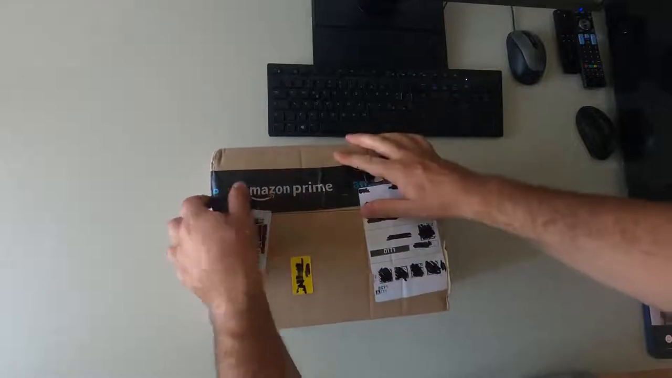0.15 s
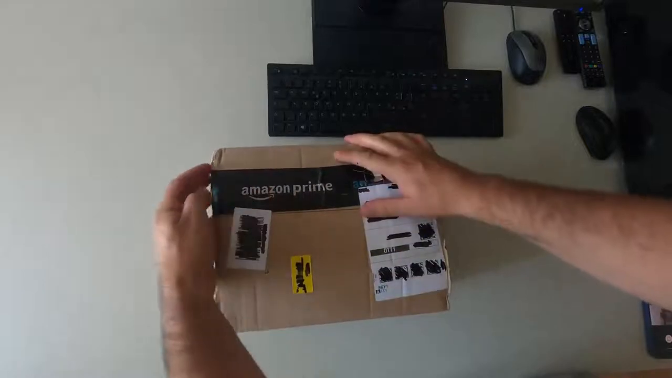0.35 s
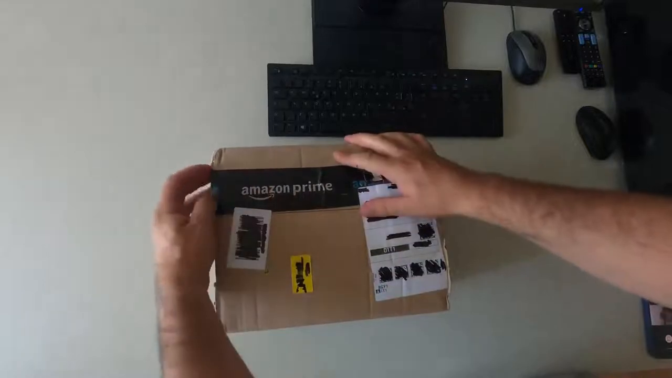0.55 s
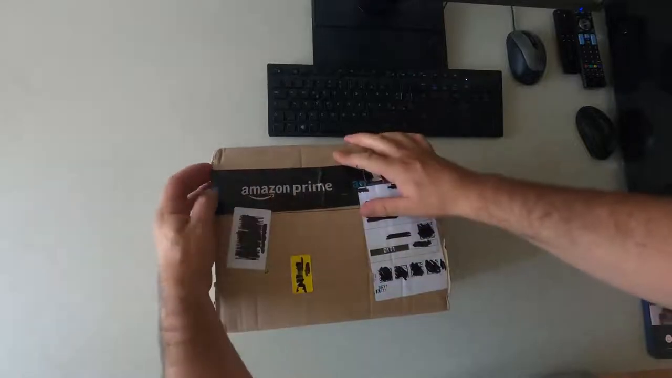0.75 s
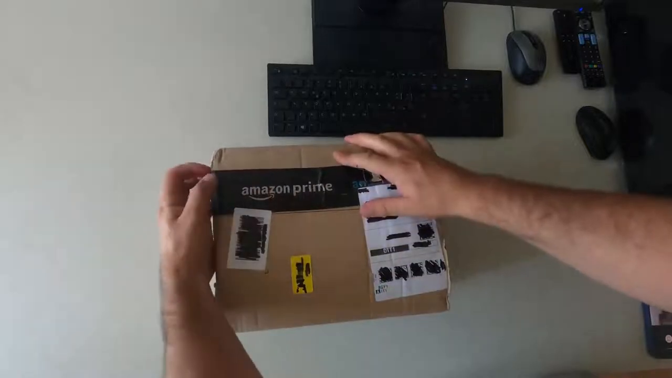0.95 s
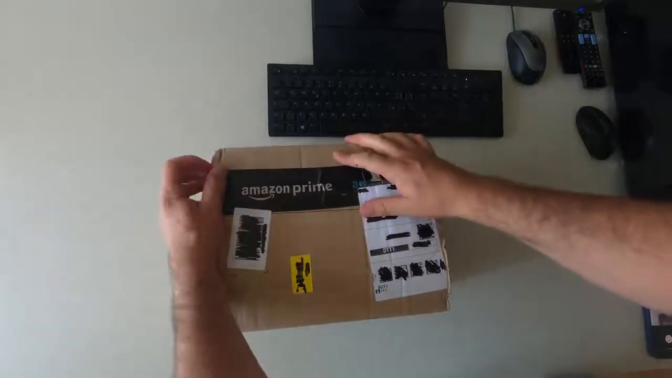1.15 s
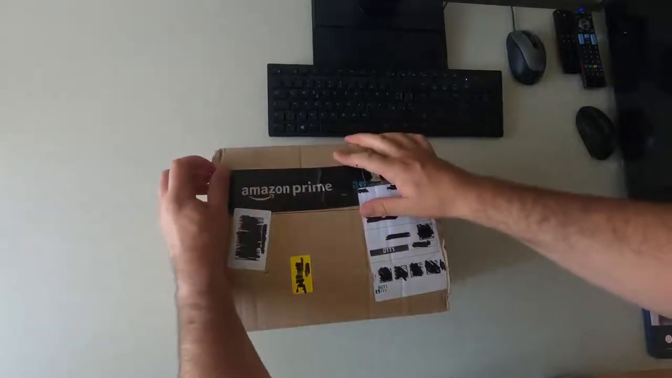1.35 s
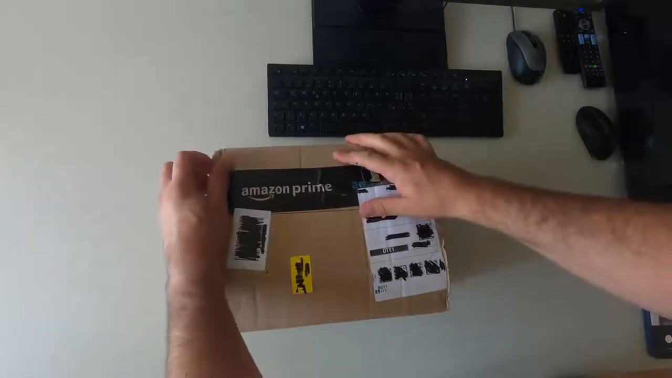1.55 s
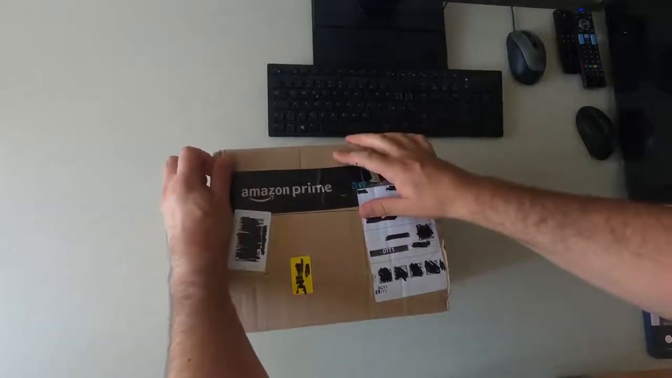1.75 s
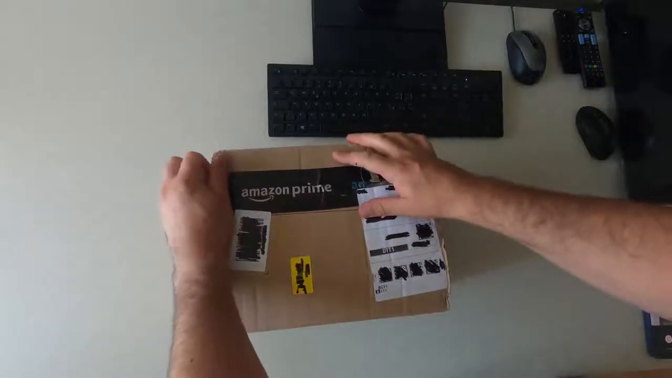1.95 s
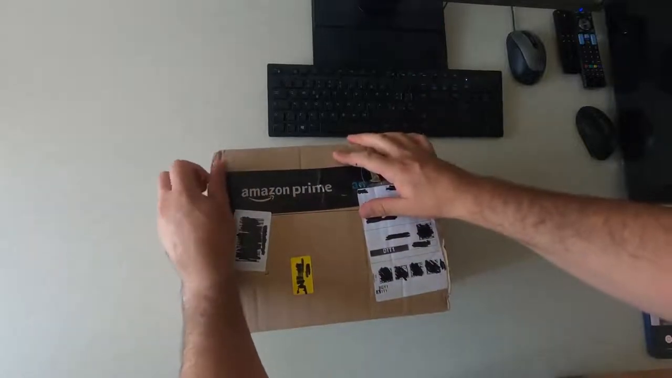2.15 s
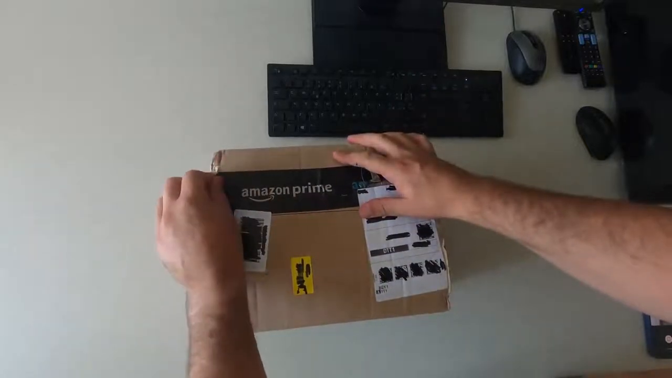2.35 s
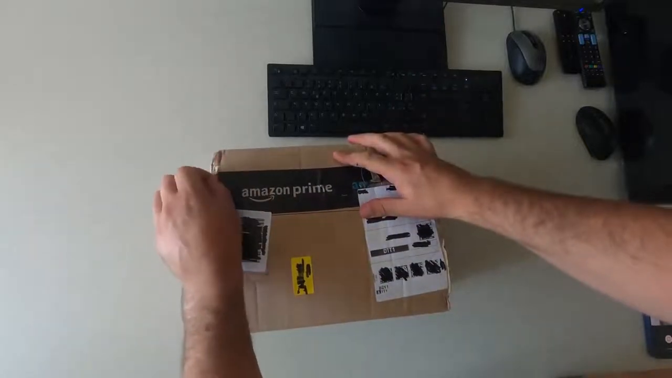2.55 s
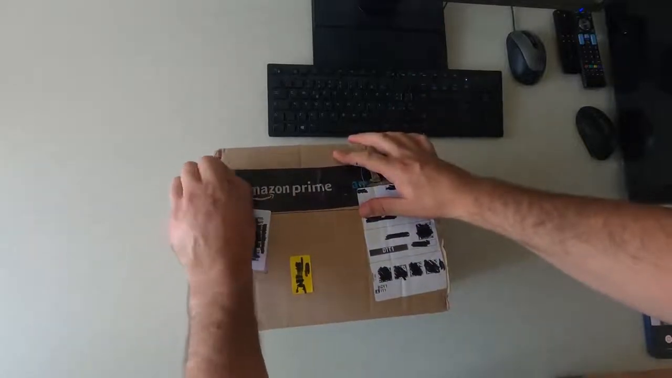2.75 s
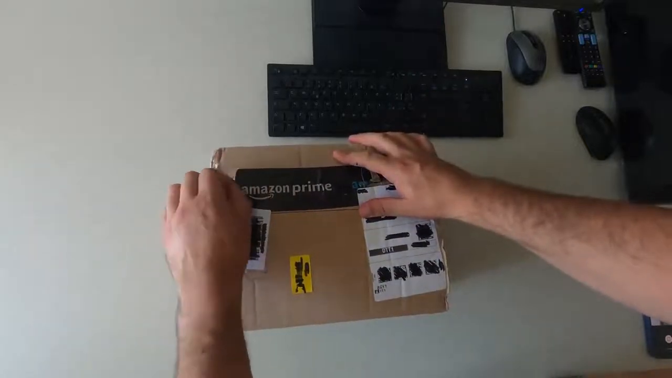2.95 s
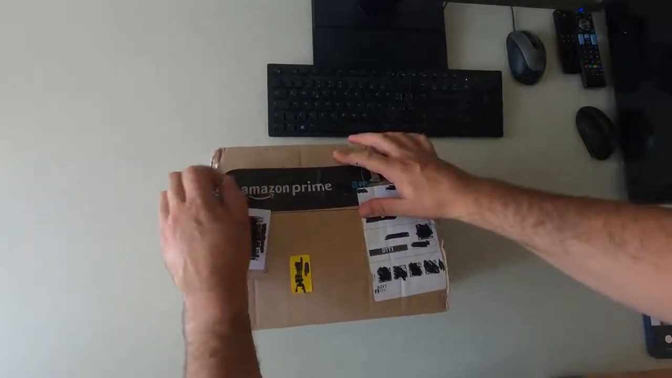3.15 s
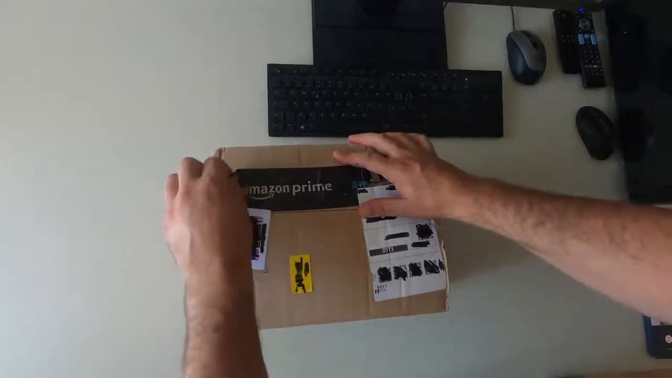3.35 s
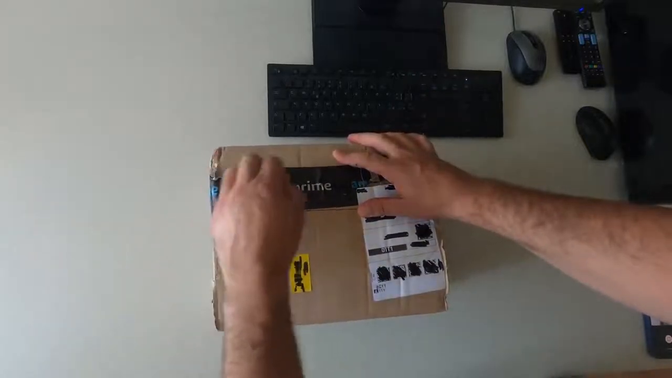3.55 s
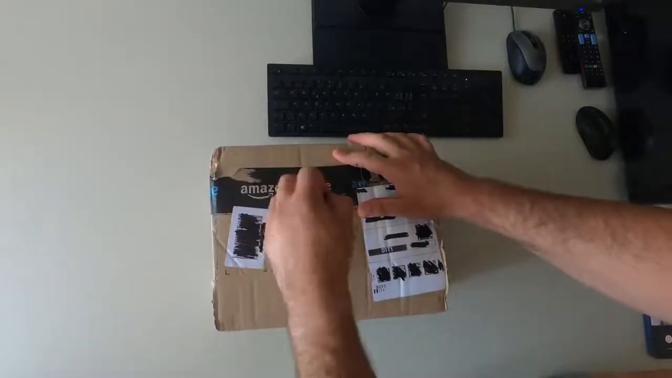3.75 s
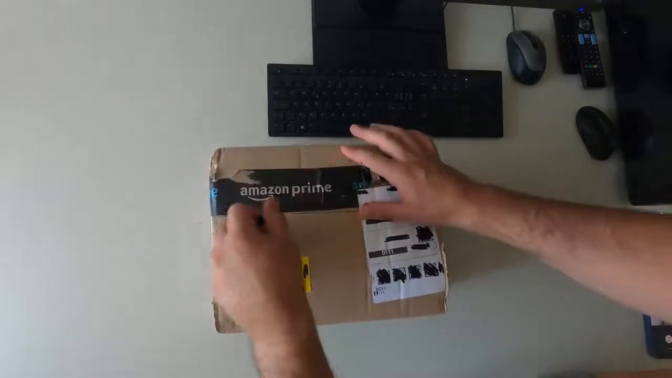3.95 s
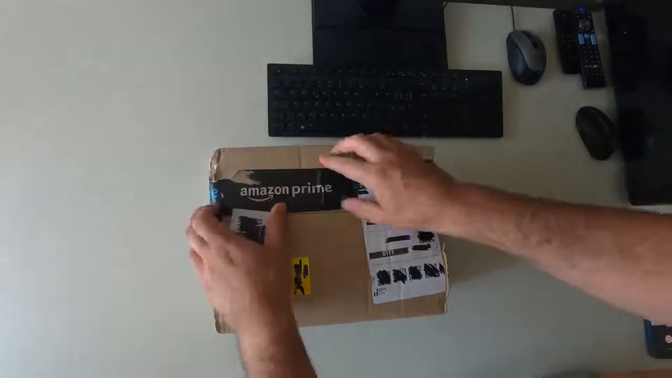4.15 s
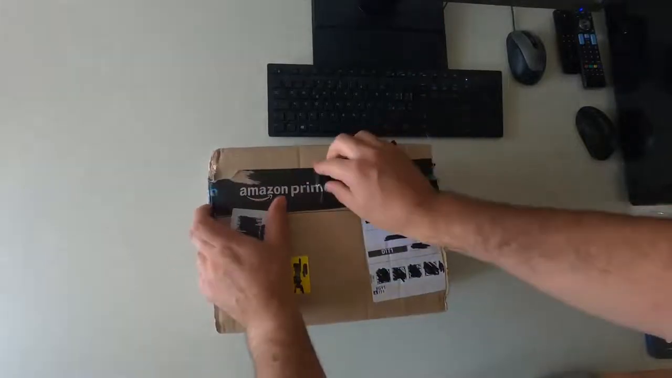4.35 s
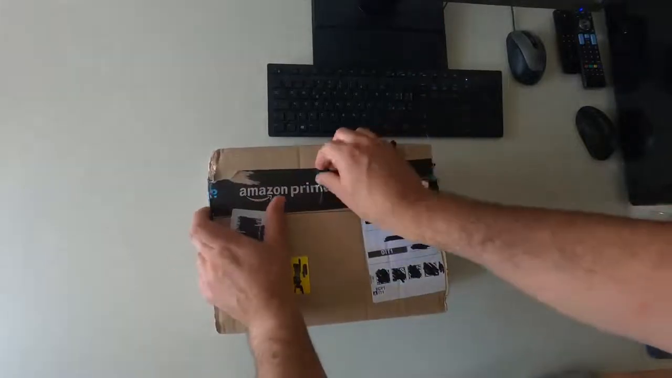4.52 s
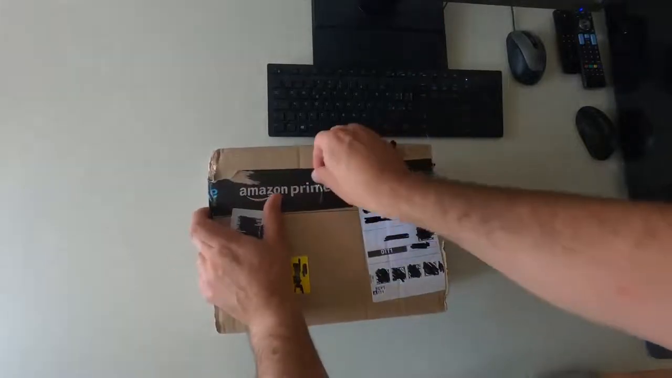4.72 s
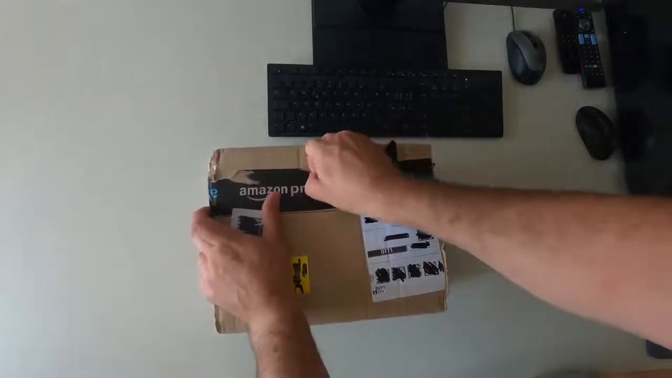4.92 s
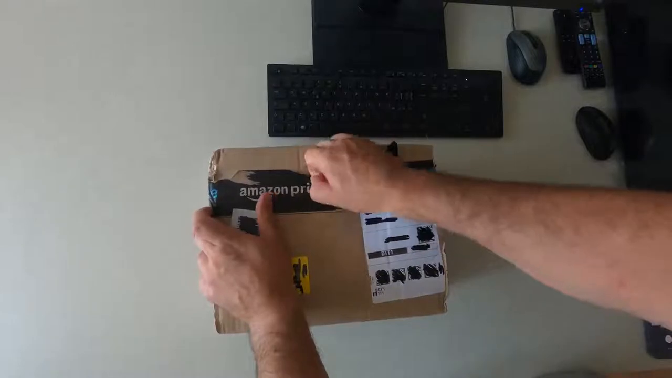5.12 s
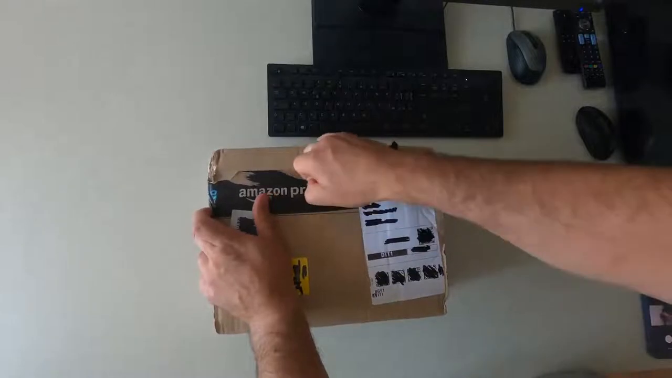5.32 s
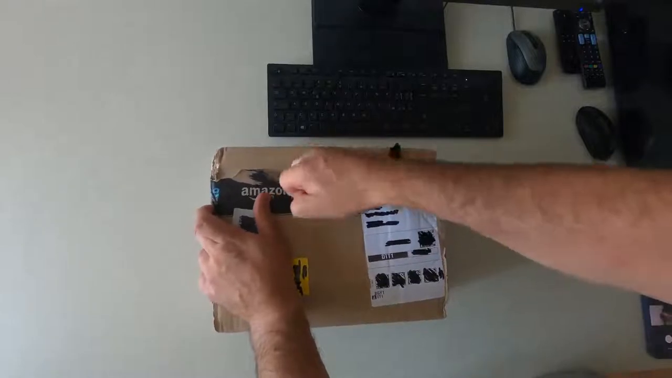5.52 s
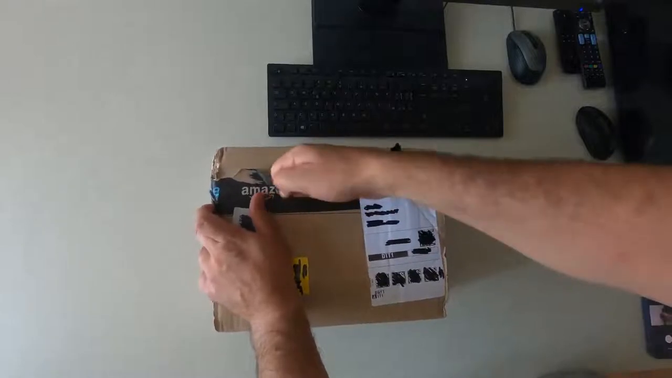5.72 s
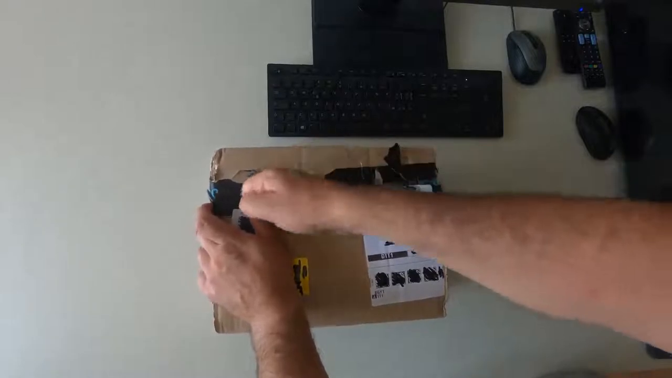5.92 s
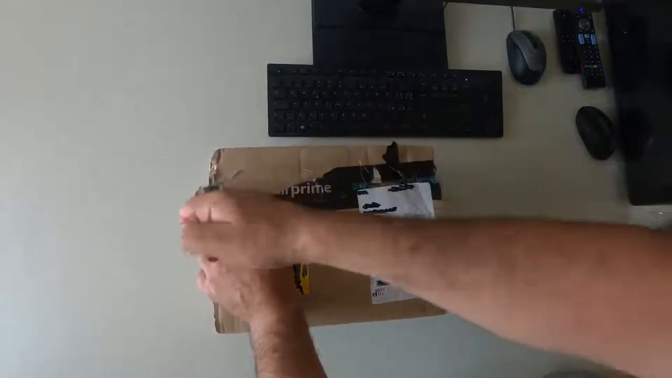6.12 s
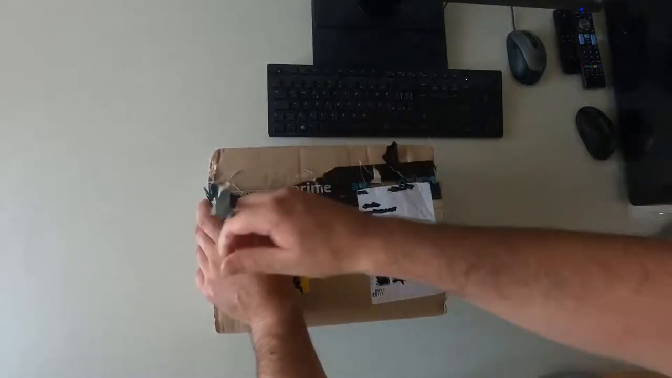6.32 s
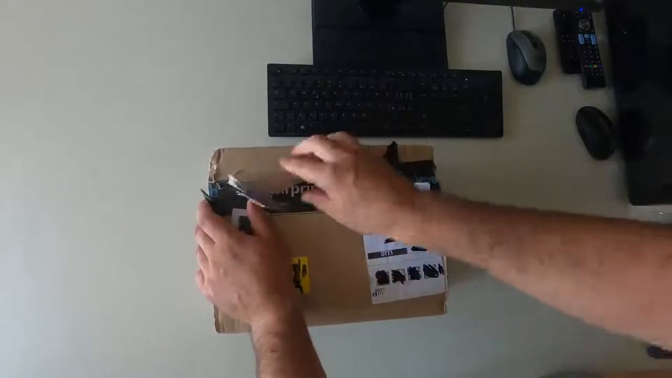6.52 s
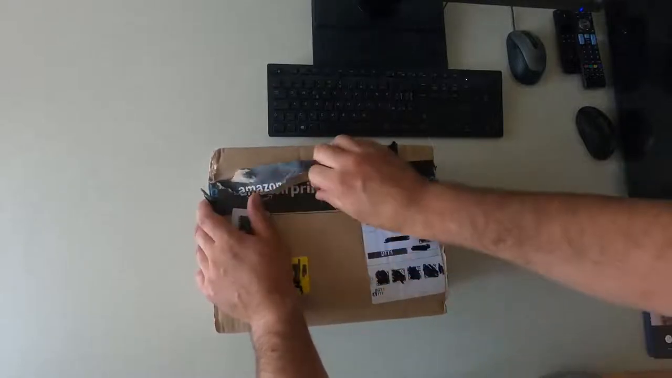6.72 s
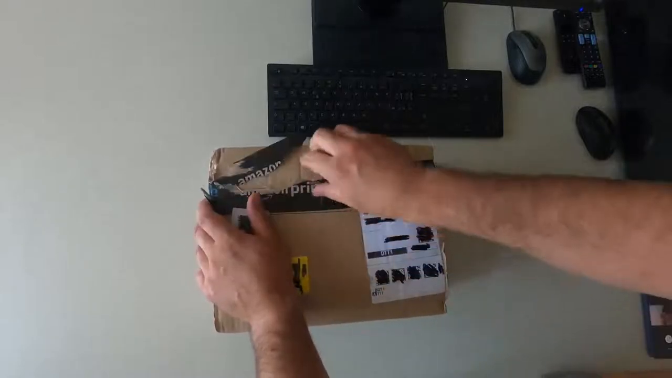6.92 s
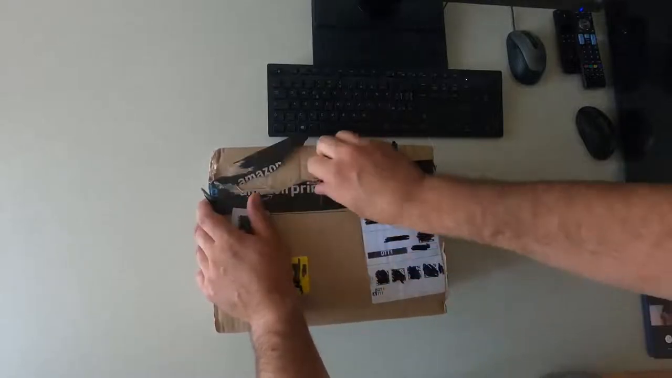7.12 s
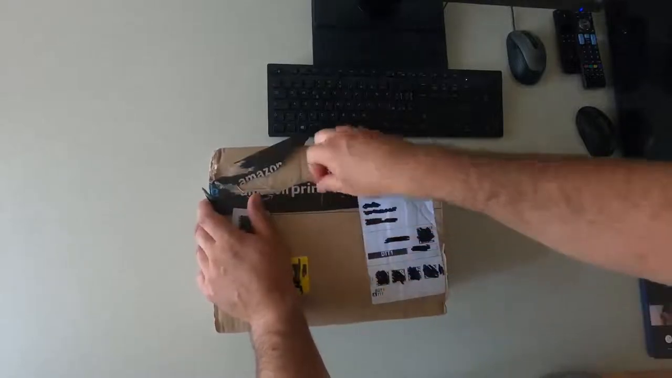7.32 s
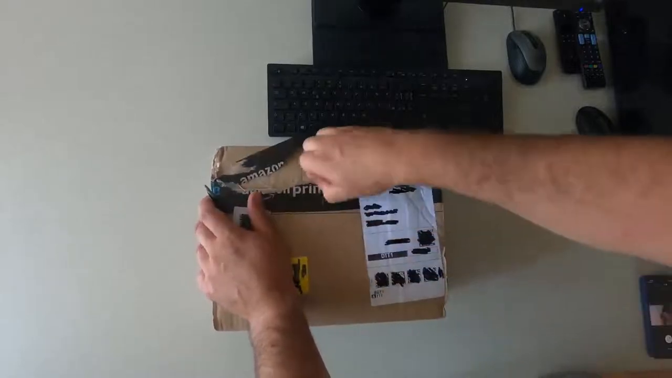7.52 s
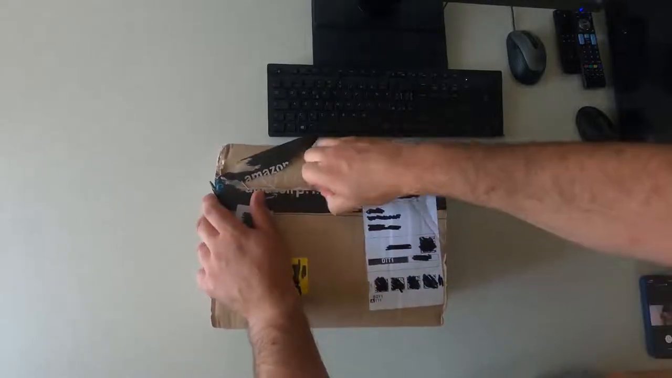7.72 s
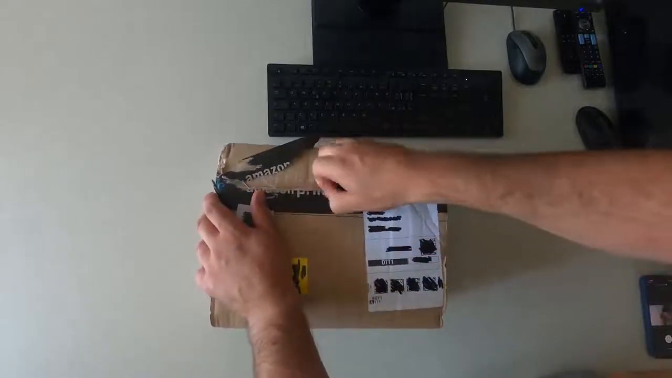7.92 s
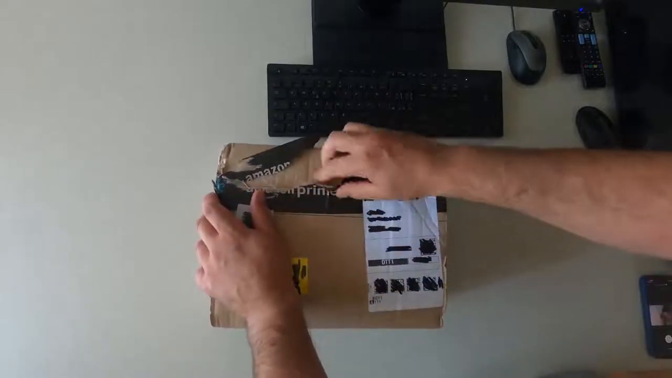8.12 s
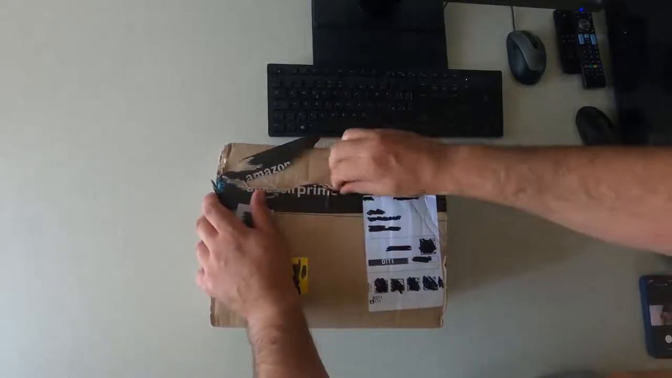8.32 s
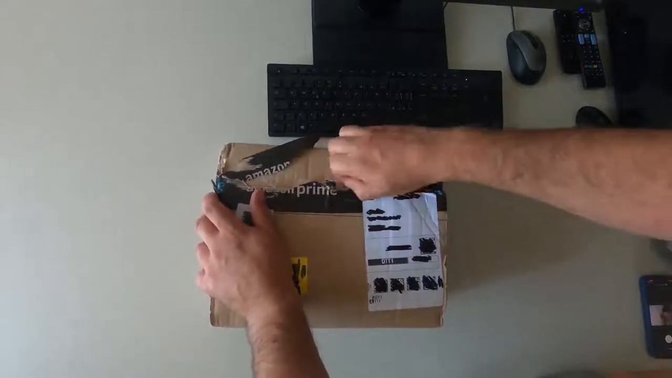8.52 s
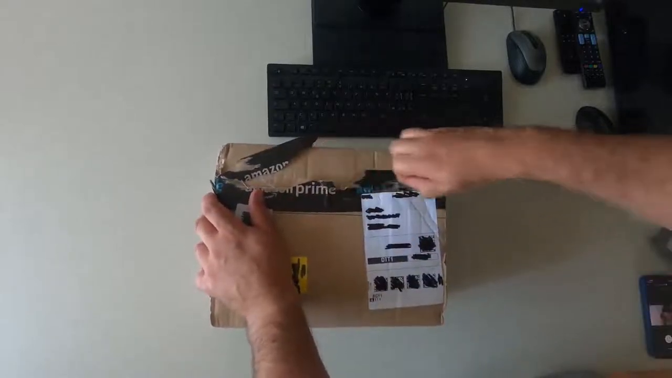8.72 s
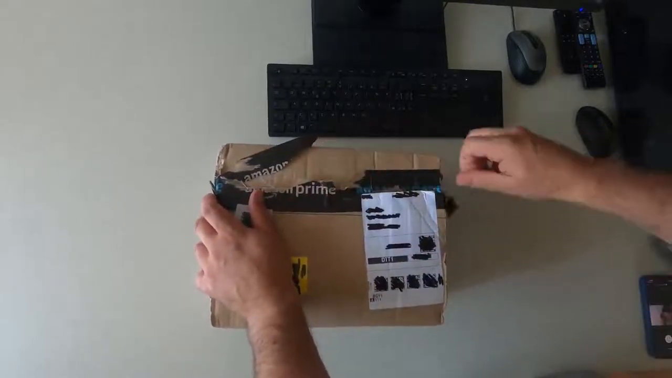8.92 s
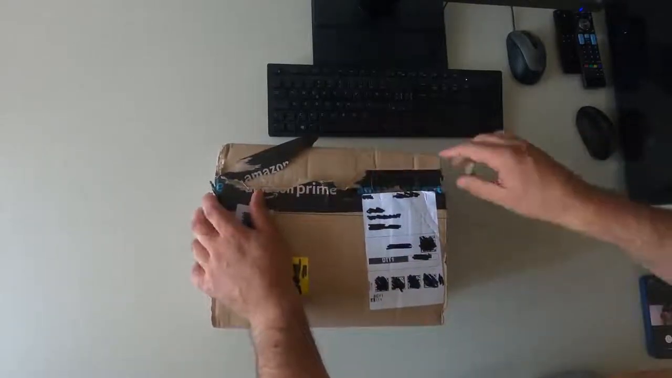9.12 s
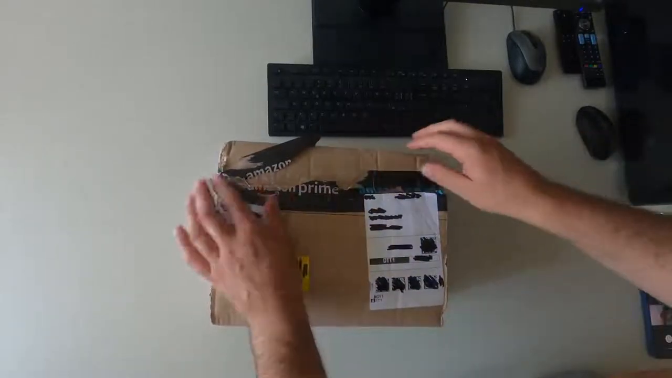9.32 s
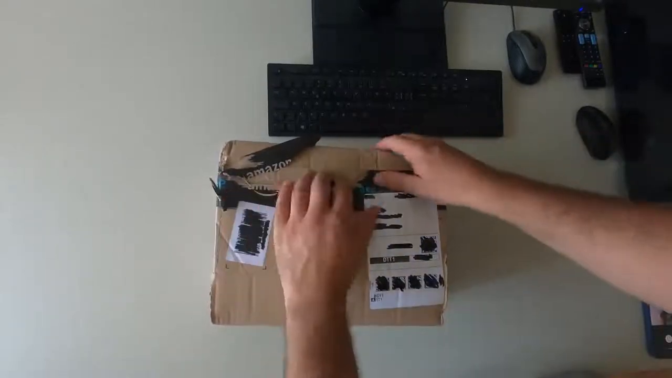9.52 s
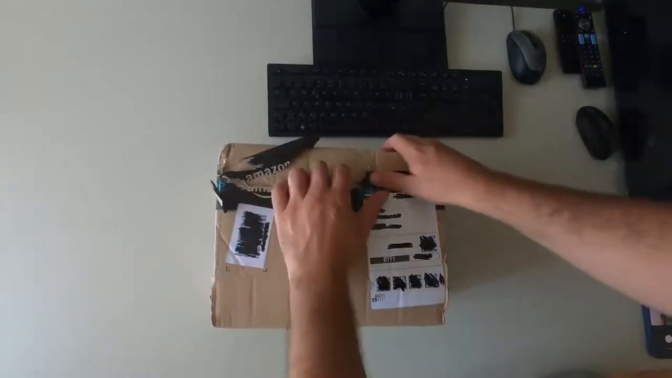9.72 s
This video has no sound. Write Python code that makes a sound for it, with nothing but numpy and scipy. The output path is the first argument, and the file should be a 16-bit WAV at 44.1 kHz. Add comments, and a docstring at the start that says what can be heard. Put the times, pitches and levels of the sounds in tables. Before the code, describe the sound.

Dry tape crackles and snaps loose from a cardboard carton in uneven tearing bursts, with hollow thumps and soft desk bumps in a small room.

```python
"""Tape ripped off a cardboard box

Hands pick at and rip paper tape off a box on a desk, in a small room, under a camera.
Glue and fibres let go as random-click crackle and single noise bursts with short tones;
both drive resonances of the hollow box and its flaps. Knocks ring box and desk; shoves bump the desk.
Two microphones are mixed: a recessed one with a port resonance on both sides, an open one on the right only.
"""
import sys
import numpy as np
from scipy import signal
from scipy.fft import rfft, irfft, next_fast_len
from scipy.io import wavfile
from scipy.ndimage import map_coordinates

SR = 44100
rng = np.random.default_rng(int(sys.argv[2]) if len(sys.argv) > 2 else 0)


def dump(signal):
    """Clip the signal to [-1, 1] and save it as 16-bit WAV at the path in sys.argv[1]."""
    limited = np.clip(np.atleast_2d(signal).T, -1, 1)
    pcm = np.round(limited * 32767).astype(np.int16)
    wavfile.write(sys.argv[1], SR, pcm)


N = 434826


def amp(db):
    """Gain of a level in dB."""
    return 10 ** (np.asarray(db) / 20)


def unit(x):
    """x at rms 1."""
    return x / np.sqrt(np.mean(x ** 2) + 1e-20)


def norm(x):
    """x at energy 1."""
    return x / np.linalg.norm(x)


def along(points, hz):
    """(Hz, value) points read on a log frequency axis."""
    f, v = np.transpose(points)
    return np.interp(np.log(hz + 1), np.log(f + 1), v)


def curves(rows):
    """One value per sample for each column after the time."""
    time_s, *columns = np.transpose(rows)
    return [np.interp(np.arange(N) / SR, time_s, c) for c in columns]


def wobble(rate_hz, step=32):
    """Smooth random curve, rate_hz knots a second."""
    at = np.arange(0, N + step, step)
    knots = rng.standard_normal(int(N * rate_hz / SR) + 4)
    return np.interp(np.arange(N), at, map_coordinates(knots, [at * rate_hz / SR]))


def filtered(x, response):
    """x times a complex response of frequency."""
    m = 2 * next_fast_len(N // 2 + SR // 4)
    return irfft(rfft(x, m) * response(np.fft.rfftfreq(m, 1 / SR)), m)[..., :N]


def colour(points):
    """Causal (minimum-phase) response through (Hz, dB) points, by folding the cepstrum."""
    def response(hz):
        cepstrum = irfft(np.log(amp(along(points, hz)) + 1e-4))
        cepstrum[1:len(hz) - 1] *= 2
        cepstrum[len(hz):] = 0
        return np.exp(rfft(cepstrum))
    return response


def modes(table):
    """Causal response of (Hz, width Hz, dB) resonances, alternating in sign."""
    def response(f):
        total = 0
        for k, (c, w, db) in enumerate(table):
            total = total + (-1) ** k * amp(db) * 1j * f * w / (c * c - f * f + 1j * f * w)
        return total
    return response


def even(response):
    """The response scaled so that white noise keeps its rms."""
    def scaled(hz):
        gain = response(hz)
        return gain / np.sqrt(np.mean(np.abs(gain) ** 2))
    return scaled


def crackle(per_second, spread_db, clump_db, hiss):
    """Fibres parting: random clicks of widely spread size on a hiss, all in clumps; rms 1."""
    size_db = spread_db * np.minimum(rng.exponential(size=N), 2.6)
    clicks = (rng.random(N) < per_second / SR) * rng.standard_normal(N) * amp(size_db)
    return unit((unit(clicks) + hiss * rng.standard_normal(N)) * amp(clump_db * wobble(110)))


def stroke(start_s, swell_s, hold_s, dies_db_per_s):
    """Sample span and gain: rises 20 dB per swell time up to start_s, holds, dies linearly in dB."""
    span = np.arange(max(round((start_s - .5) * SR), 0), min(round((start_s + 1) * SR), N))
    t = span / SR - start_s
    rise_db = 20 * np.minimum(t, 0) / max(swell_s, .002)
    return span, amp(rise_db - np.multiply.outer(dies_db_per_s, np.maximum(t - hold_s, 0)))


# fingers resting and creeping on the box, before wobble and mix gains: time_s, crackle_db, drumming_db
CREEP_LEVELS = [(0.0, -65.5, -56.5), (0.85, -72.5, -55), (0.99, -75, -59), (1.43, -61.5, -57.5),
                (1.84, -67, -54.5), (1.98, -51.5, -48.5), (2.5, -65, -61.5), (2.83, -61.5, -59),
                (3.04, -93, -60), (3.32, -75, -63), (3.43, -63, -47), (3.76, -74, -65.5), (4.06, -62, -51),
                (4.28, -63, -51.5), (4.67, -66.5, -57.5), (5.22, -66, -53.5), (5.55, -69, -50),
                (5.99, -41, -51), (6.29, -66.5, -57.5), (6.45, -89.5, -67.5), (6.76, -90, -56.5),
                (7.25, -64.5, -58.5), (7.63, -64, -63), (8.02, -75, -57), (8.29, -57.5, -51),
                (8.57, -45, -47), (8.93, -86, -52.5), (9.45, -63, -57), (9.69, -54, -47), (9.86, -45, -40)]
# tugs on the tape, before mix gains; drumming, buzz and crispness re crackle:
# start_s, swell_s, hold_s, crackle_db, drumming_db, buzz_db, crisp_db, strip_ring_hz
TAPE_TUGS = [(0.189, 0.15, 0.14, -56.5, 10, 5, -8, 3420), (0.478, 0.04, 0.0077, -46, -3, -3, -12.5, 3460),
             (0.603, 0.019, 0.0058, -57, 15, 1.5, -22.5, 2340),
             (0.722, 0.024, 0.013, -54.5, 5, 5, -7.5, 3460), (0.867, 0.0017, 0.042, -48, 7.5, 6, -24, 2250),
             (0.925, 0.036, 0.036, -51.5, 15, 1, -19, 1700), (0.992, 0.02, 0.09, -59.5, 10.5, 3, -16, 2500),
             (1.135, 0.037, 0.013, -52, 12, 9, -15, 2010),
             (1.372, 0.061, 0.0097, -50, -1.5, 3.5, -13, 2830),
             (1.543, 0.098, 0.05, -56.5, 11, -0.5, -6.5, 3330),
             (1.656, 0.048, 0.17, -62.5, 16.5, 5.5, -5.5, 3200),
             (1.8, 0.045, 0.1, -53.5, -3.5, 3.5, -9.5, 3400), (1.914, 0.031, 0.0078, -33, 0, -2, -9, 4500),
             (1.942, 0.014, 0.02, -44.5, 16.5, 8, -31, 3380),
             (2.05, 0.021, 0.054, -46.5, -17, -24, -13, 3000),
             (2.13, 0.019, 0.024, -45, 5, 4.5, -14.5, 2950),
             (2.197, 0.031, 0.099, -57, 6.5, -24, -11, 3720), (2.504, 0.1, 0.16, -58.5, 5.5, -13, -6, 3950),
             (2.637, 0.01, 0.057, -31.5, 3, -1.5, -16, 2370),
             (2.804, 0.033, 0.015, -50.5, 5, -12, -8, 2310), (2.867, 0.081, 0.083, -45, 3.5, -4, -11, 2300),
             (2.967, 0.007, 0.015, -49.5, 2, -8.5, -30, 2300),
             (3.287, 0.006, 0.021, -46, 1.5, 4, -19.5, 2970),
             (3.378, 0.0018, 0.0066, -36, -2, -2, -15, 3300),
             (3.397, 0.002, 0.094, -31.5, 2.5, -5, -19, 2700),
             (3.782, 0.0073, 0.042, -60, 7.5, -1, -6.5, 3800), (3.87, 0.035, 0.1, -58, 2, -4, -14.5, 4270),
             (3.96, 0.005, 0.066, -55.5, 10.5, 6, -13, 2700),
             (4.231, 0.073, 0.034, -50, 9.5, 1, -14.5, 2800), (4.339, 0.071, 0.013, -55, 18, 4, -15, 3360),
             (4.43, 0.089, 0.046, -56.5, 15.5, 7, -31.5, 3620),
             (4.531, 0.023, 0.063, -57.5, 10.5, 3.5, -26, 3060),
             (4.717, 0.007, 0.26, -55, -10, -0.5, -2, 4700), (4.854, 0.044, 0.08, -38.5, 7, 2, -10.5, 3480),
             (5.087, 0.073, 0.027, -54, 2, -4.5, -7.5, 3830), (5.172, 0.011, 0.09, -54, 7, 3.5, -6, 3640),
             (5.296, 0.029, 0.039, -40, -2, -3.5, -9, 4000), (5.351, 0.0077, 0.012, -38, 12, -19, -9, 3480),
             (5.381, 0.031, 0.011, -23.5, 1.5, -3.5, -15.5, 2700),
             (5.459, 0.014, 0.068, -42.5, 6, 3.5, -22.5, 3080),
             (5.555, 0.025, 0.09, -45.5, 6.5, 1.5, -11.5, 3240),
             (5.596, 0.039, 0.069, -38.5, 0, -18, -12, 2760),
             (5.693, 0.014, 0.067, -44.5, 15, -14, -24, 2800),
             (5.746, 0.015, 0.055, -47.5, 18, -8, -23, 2200),
             (5.812, 0.014, 0.047, -51, 13, -5.5, -19.5, 2460),
             (5.921, 0.0017, 0.051, -34.5, 13.5, 2.5, -12, 2580),
             (5.974, 0.077, 0.09, -41, 18.5, 0.5, -17, 2640),
             (5.978, 0.0091, 0.0059, -28, -6, -7, -14.5, 3000),
             (6.047, 0.011, 0.021, -30, 5.5, -1.5, -17, 3670),
             (6.52, 0.01, 0.092, -64, 13.5, -1, -5.5, 3220), (6.628, 0.18, 0.04, -51.5, 9.5, 4, -17, 2800),
             (6.757, 0.0017, 0.092, -51, 4, 2.5, -18.5, 3300), (6.916, 0.05, 0.083, -51, 7, 9, -16.5, 2670),
             (7.081, 0.005, 0.022, -48.5, 14, 8.5, -15, 2950),
             (7.204, 0.097, 0.031, -45.5, 1.5, 1, -18.5, 4270),
             (7.358, 0.0017, 0.076, -48, 5.5, -1, -9.5, 4130),
             (7.518, 0.039, 0.024, -40, 6.5, 0.5, -14, 3830),
             (7.553, 0.022, 0.028, -38, -1, -7, -15.5, 4170),
             (7.621, 0.019, 0.024, -52, 9.5, -6, -18, 3000), (7.713, 0.021, 0.06, -53, 3, -7, -16, 3580),
             (7.782, 0.0017, 0.015, -32, 4, -14, -19, 3400), (7.932, 0.032, 0.074, -47, -6, 0, -23, 3570),
             (8.192, 0.24, 0.076, -49, 5.5, -3.5, -13, 3570),
             (8.354, 0.005, 0.041, -42.5, 5, 4, -8.5, 3750),
             (8.383, 0.004, 0.039, -37, 3.5, 2.5, -11, 3570),
             (8.455, 0.054, 0.029, -29.5, 0.5, -1, -12, 3270), (8.514, 0.039, 0.017, -30.5, 0, 3, -9, 3170),
             (8.555, 0.046, 0.022, -29.5, -5, 0, -10.5, 3260),
             (8.598, 0.017, 0.022, -32.5, -7.5, -4, -9, 3100),
             (8.701, 0.12, 0.046, -37, -1.5, -5.5, -9, 3720),
             (8.811, 0.021, 0.042, -49.5, -17, -2, -6.5, 3740),
             (8.92, 0.069, 0.033, -54.5, -3, -23, -6.5, 4130),
             (9.014, 0.033, 0.059, -54, -2, -6, -7.5, 4400), (9.12, 0.028, 0.13, -69, 18, -2, -13, 4430),
             (9.213, 0.12, 0.019, -46.5, 9, -1, -10.5, 4360),
             (9.412, 0.078, 0.065, -51.5, 7.5, -2, -6.5, 4300),
             (9.553, 0.074, 0.0092, -40.5, 5, 6, -9, 3000), (9.615, 0.024, 0.095, -45, 9.5, 2, -13, 3280),
             (9.754, 0.18, 0.03, -41.5, 3.5, 5.5, -6, 2550), (9.815, 0.018, 0.016, -34, 0, 3.5, -13, 3000)]


def pull():
    """Gains of crackle, drumming, buzz and crispness, powers summed; strip ring gliding tug to tug."""
    creep_db, box_db = curves(CREEP_LEVELS) + 3.2 * wobble(6.2)
    power = amp([creep_db, box_db, creep_db + 1, creep_db - 13.5]) ** 2
    dies_db_per_s = (705, 353, 446, 600)  # crackle, drumming, buzz, crispness
    for start_s, swell_s, hold_s, db, drum_db, buzz_db, crisp_db, _ in TAPE_TUGS:
        span, gain = stroke(start_s, swell_s, hold_s, dies_db_per_s)
        levels_db = db + np.array([[0], [drum_db], [buzz_db], [crisp_db]])
        power[:, span] += (amp(levels_db) * gain) ** 2
    mid_hold_s = [row[0] + row[2] / 2 for row in TAPE_TUGS]
    ring_hz = np.interp(np.arange(N) / SR, mid_hold_s, [row[-1] for row in TAPE_TUGS])
    return *np.sqrt(power), ring_hz


# where the loose strip can ring: centre_hz
STRIP_RINGS = (1550, 2300, 2750, 3300, 3900, 4600, 5700)


def strip(drive, ring_hz, lift, patchy_db):
    """Loose strip lifts resonances near ring_hz and an overtone; each also swells and fades by chance."""
    def close(ratio):
        return np.exp(-(np.log(ratio) / .11) ** 2)

    overtone_ratio, overtone_share = 1.367, 0.36
    out = 0.89 * drive
    for hz in STRIP_RINGS:
        match = close(ring_hz / hz) + overtone_share * close(overtone_ratio * ring_hz / hz)
        gain = (lift * match + 0.16) * amp(patchy_db * wobble(30))
        out = out + signal.lfilter(*signal.iirpeak(hz, 7, SR), drive * gain)
    return out


def walls(drive, table, patchy_db, rate_hz, struck_hz, away_db):
    """Resonances swell and fade as hands press elsewhere; those far from struck_hz lose away_db."""
    size = np.sqrt(sum(amp(db) ** 2 * np.pi * w / SR for _, w, db in table))
    out = 0
    for k, (c, w, db) in enumerate(table):
        near_db = away_db * (np.exp(-(np.log(struck_hz / c) / 0.26) ** 2) - 1)
        driven = drive * amp(near_db + patchy_db * wobble(rate_hz))
        out = out + (-1) ** k * amp(db) * signal.lfilter(*signal.iirpeak(c, c / w, SR), driven)
    return out / size


# air and walls of the box, then top flaps: centre_hz, width_hz, relative_db
BOX_MODES = [(216, 50, -8.5), (276.6, 42, -3), (347, 25.4, -0.5), (401.3, 43.7, -4.5), (429.6, 43, 0.5),
             (489, 165, -6.5), (614, 104, -11.5)]
FLAP_MODES = [(682, 26, -0.5), (777, 76, 0), (991, 111, 1.5), (1266, 350, -0.5), (1710, 315, -4)]
# spectra of parting fibres and of their crisp edge: freq_hz, relative_db (per Hz)
FIBRE_SPECTRUM = [(880, -29), (1550, 3), (1880, 0), (2150, 8), (2660, 3.5), (3550, 4.5), (4090, 6),
                  (5080, 2.5), (6420, -4), (7500, -4), (9750, -19.5), (16500, -120)]
CRISP_SPECTRUM = [(3820, -26.5), (6500, -5.5), (7470, -11.5), (8430, -5), (9980, -11.5), (12300, -11),
                  (15600, -24)]
# wall left free to drum as the hands move: time_s, pitch_hz
DRUM_PITCH = [(0.0, 285), (0.16, 340), (0.69, 296), (0.9, 468), (1.21, 370), (2.14, 403), (2.3, 310),
              (2.94, 441), (3.13, 277), (3.4, 400), (3.46, 537), (3.6, 482), (3.84, 356), (7.91, 375),
              (8.1, 445), (8.35, 310), (8.51, 430), (8.93, 269), (9.69, 377), (9.86, 354)]


def tape():
    """Crackle and snaps sound directly and through the box they are glued to."""
    parting, drumming, buzzing, crisp, ring_hz = pull()
    tear = crackle(per_second=3500, spread_db=3.2, clump_db=2.2, hiss=.65)
    scrape = crackle(per_second=700, spread_db=3.2, clump_db=2.2, hiss=.6)  # coarser jerks reach the flaps
    crack, jerk, edge, tones, snap_hz, flap_hz = snaps()
    fibres = strip(amp(-3.0) * parting * tear, ring_hz, lift=1.145, patchy_db=4.0)
    fibres = fibres + strip(crack, snap_hz, lift=.8, patchy_db=3)
    direct = filtered(fibres, even(colour(FIBRE_SPECTRUM)))
    box = walls(amp(6.0) * drumming * tear, BOX_MODES, patchy_db=3.0, rate_hz=8,
                struck_hz=curves(DRUM_PITCH)[0], away_db=7.0)
    flaps = walls(amp(2) * buzzing * scrape + amp(3.5) * jerk, FLAP_MODES, patchy_db=3.5, rate_hz=14,
                  struck_hz=flap_hz, away_db=5.5)
    crispness = filtered(amp(6.5) * crisp * tear + edge, even(colour(CRISP_SPECTRUM)))
    return tones + direct + box + flaps + crispness


# desk top resonances: centre_hz, width_hz, relative_db
DESK_MODES = [(105.3, 5.5, -12), (110.5, 40, -1), (163, 163, -1)]
# box shoved over the desk, before mix gain: start_s, hold_s, thud_db
DESK_SHOVES = [(0.042, 0.02, -67), (0.362, 0.032, -58), (0.88, 0.02, -56), (1.143, 0.038, -54),
               (1.92, 0.034, -45.5), (2.661, 0.035, -42), (2.982, 0.022, -40), (3.288, 0.029, -41.5),
               (3.398, 0.02, -41), (4.08, 0.039, -55), (4.31, 0.14, -54.5), (4.59, 0.028, -58),
               (4.87, 0.073, -47.5), (5.372, 0.025, -32.5), (5.648, 0.017, -32.5), (5.978, 0.032, -39.5),
               (6.5, 0.031, -65.5), (6.776, 0.024, -49), (7.206, 0.021, -55), (7.398, 0.035, -51),
               (7.518, 0.02, -42), (7.782, 0.014, -39.5), (8.52, 0.063, -40.5), (8.708, 0.025, -41.5),
               (9.21, 0.057, -60), (9.444, 0.033, -55), (9.84, 0.025, -45)]


def desk():
    """Box bumps and slides on the desk top, whose mass swallows the treble; one boom as the strip frees."""
    def top(hz):
        return modes(DESK_MODES)(hz) / (1 + 1j * hz / 300) ** 2

    bumps = crackle(per_second=160, spread_db=3.0, clump_db=1.5, hiss=0.88)
    weight = amp(curves(CREEP_LEVELS)[1] - 6.5)  # under creeping fingers
    for start_s, hold_s, db in DESK_SHOVES:
        span, gain = stroke(start_s, swell_s=0.016, hold_s=hold_s, dies_db_per_s=302.5)
        weight[span] += amp(db) * gain
    boom_s, boom_half_s, boom_db, boom_hz = 8.658, 0.036, -29.5, 93  # half width to 1/e
    t = np.arange(N) / SR - boom_s
    boom = amp(boom_db) * np.sin(2 * np.pi * boom_hz * t) * np.exp(-(t / boom_half_s) ** 2)
    return filtered(amp(7.5) * weight * bumps, even(top)) + boom


# reverberation: freq_hz, t60_s
ROOM_DECAY = [(100, 0.12), (700, 0.55), (5000, 0.35), (12000, 0.26)]


def room(x, count=3):
    """Reverberation at both microphones; hands move, so random echo patterns crossfade every 0.25 s."""
    turn = np.arange(N) / SR / .25 % count
    wet = 0
    for k in range(count):
        hz, t, z = signal.stft(rng.standard_normal((2, SR // 2)), SR, nperseg=256)
        decay = amp(-60 * t / along(ROOM_DECAY, hz)[:, None])
        tail = signal.istft(z * decay, SR, nperseg=256)[1]
        window = np.clip(1 - np.abs((turn - k + count / 2) % count - count / 2), 0, 1)
        delayed = np.pad(x * window, (130, 0))  # samples
        wet = wet + signal.fftconvolve(delayed[None], tail / np.linalg.norm(tail[0]), axes=1)[:, :N]
    return wet


# room tone: freq_hz, relative_db (per Hz)
QUIET_SPECTRUM = [(24, -33.5), (40, -10.5), (78, -31), (164, -7.5), (313, -34.5), (956, -44.5),
                  (1260, -11.5), (6620, -44.5), (9600, -76.5), (15000, -61.5)]


def room_tone():
    """Steady coloured noise, independent at the two microphones."""
    level_db = -72
    return amp(level_db) * filtered(rng.standard_normal((2, N)), even(colour(QUIET_SPECTRUM)))


# rumble spectrum: freq_hz, relative_db (per Hz)
RUMBLE_SPECTRUM = [(12, -35), (28, 2.5), (55, 3.5), (80, -33.5), (200, -54.5)]
# shake of the camera mount, before wobble: time_s, level_db
MOUNT_SHAKE = [(0.0, -45), (0.19, -82), (0.33, -56), (1.48, -103), (1.87, -72.5), (1.98, -43),
               (2.41, -77.5), (2.77, -58), (2.83, -76), (3.04, -52), (3.35, -64), (3.43, -43),
               (3.95, -71.5), (4.34, -57), (4.5, -79), (5.32, -56.5), (5.38, -51), (6.07, -45),
               (6.62, -74.5), (6.81, -61.5), (6.86, -70), (8.81, -56), (8.95, -75), (9.86, -51)]


def rumble():
    """Low shake of the camera mount, partly unlike on the two sides."""
    shared, left, right = filtered(rng.standard_normal((3, N)), even(colour(RUMBLE_SPECTRUM)))
    sides = unit(0.2 * shared + np.array([0.58 * left, right]))
    return amp(curves(MOUNT_SHAKE)[0] + 0.93 * wobble(2.7)) * sides


# single snaps of glue and board, before drive gains; buzz and crispness re level:
# start_s, level_db, buzz_db, crisp_db, ring_hz, flap_hz (flap it jerks)
GLUE_SNAPS = [(0.143, -53.5, 3, -26, 1770, 1200), (0.8693, -41.5, 3, -33, 2160, 1390),
              (1.1323, -53.5, 6, -28, 2500, 1710), (1.148, -46, 3, -30, 2530, 1800),
              (1.8777, -32.5, -10, -13, 2380, 1404), (1.9193, -11.5, -9, -27, 5880, 1670),
              (2.044, -42, 1.5, -28, 2270, 1034), (2.1368, -40.5, -11, -19, 3410, 852),
              (2.4214, -47.5, -1, -18.5, 1820, 1055), (2.644, -15, -19, -13.5, 2290, 1248),
              (2.6499, -23, -6, -21.5, 2410, 1490), (2.8106, -34, -25, -24, 3280, 1400),
              (2.845, -34, -45, -21, 2900, 703), (2.864, -29, -30, -19.5, 2800, 1430),
              (2.8705, -27, -35, -18, 2860, 773), (2.891, -32.5, -13, -29.5, 2350, 1040),
              (2.906, -35.5, -13, -25.5, 2490, 1400), (2.92, -36, -11, -30, 2290, 1420),
              (2.937, -40.5, -19, -22, 2250, 1420), (2.976, -35.5, -3, -34, 2240, 764),
              (2.994, -39.5, -12, -29, 2380, 1100), (3.274, -47, 1.5, -24, 2320, 697),
              (3.2916, -35, -4, -14.5, 2950, 666), (3.3673, -41, -5.5, -10, 2900, 651),
              (3.3817, -29, -20.5, -15.5, 3460, 1000), (3.3949, -12, -12, -18, 2790, 893),
              (3.9143, -48, -3, -15.5, 4730, 1410), (3.9679, -34.5, -1, -22, 1950, 806),
              (4.0195, -38, -6.5, -19, 2790, 1070), (4.0752, -37.5, -7, -24, 4400, 1446),
              (4.0933, -39.5, -13, -24, 3600, 651), (4.122, -46.5, -1, -20, 2200, 706),
              (4.1594, -52, 11.5, -29, 1840, 1063), (4.218, -52, 7.5, -24.5, 2900, 1084),
              (4.2339, -40.5, 1.5, -30, 2880, 1070), (4.3956, -34.5, -7, -21, 3110, 1220),
              (4.4344, -49, 2, -24, 4200, 1360), (4.4527, -38.5, -9, -35, 3820, 1274),
              (4.468, -42.5, -6, -34, 3800, 1215), (4.4955, -46.5, -0.5, -29, 3000, 1300),
              (4.527, -49, -2, -21, 3560, 1320), (4.566, -48.5, -2, -23, 3900, 1455),
              (4.589, -60.5, 15, -25.5, 3350, 1296), (4.616, -58, 13, -20, 3350, 1410),
              (4.6663, -57, 0, -25, 2500, 1090), (4.7202, -55, -18, -15, 4570, 1160),
              (4.82, -31, -15, -10, 4180, 1110), (4.851, -30.5, 8, -30, 4050, 1196),
              (5.0827, -42, -16, -8, 3380, 1020), (5.096, -37, -8, -5, 3960, 1147),
              (5.2896, -40.5, -7, -14, 4190, 1150), (5.322, -35.5, -13, -7.5, 4200, 1095),
              (5.3488, -17.5, -10.5, -25, 3650, 1020), (5.38, -24, -7, -17.5, 3310, 1288),
              (5.3854, -17, -8, -15, 3890, 1187), (5.4003, -17.5, -4.5, -18.5, 4000, 757),
              (5.459, -28, -2.5, -14, 3970, 705), (5.6077, -12.5, -7.5, -20.5, 3120, 984),
              (5.6376, -23.5, -5, -21, 3160, 830), (5.6572, -12.5, -6.5, -15.5, 2370, 770),
              (5.7633, -14, -8, -16, 1890, 985), (5.9341, -13, -9.5, -22.5, 2050, 920),
              (5.981, -19.5, -23, -14, 4290, 1050), (5.995, -11, -8, -28, 1920, 960),
              (6.0175, -16, -10, -17.5, 2000, 967), (6.7144, -41, -26, -23, 3490, 1180),
              (6.762, -36, -3.5, -16, 3370, 1110), (6.7992, -43, 4, -24, 3060, 610),
              (6.823, -31.5, -15, -25, 3270, 1090), (6.829, -38.5, -17, -19, 3570, 1130),
              (6.853, -42, -18, -19, 3500, 1110), (6.908, -46, 3, -21, 2900, 1780),
              (6.949, -44, -3, -21, 3800, 1086), (6.987, -40.5, -3, -33, 3450, 1004),
              (7.0811, -35, -5.5, -26, 1830, 1036), (7.1011, -38.5, -8, -18, 3600, 1010),
              (7.205, -35, -13, -10, 3820, 966), (7.24, -39.5, -7, -6.5, 5850, 1180),
              (7.3618, -39.5, -25, -7, 4260, 1070), (7.4018, -31.5, -12, -12.5, 3140, 1130),
              (7.433, -37.5, -9, -8.5, 3870, 1010), (7.465, -34, -24, -10.5, 5800, 1340),
              (7.5188, -26, -11, -19.5, 4220, 1206), (7.589, -38.5, -19, -13, 4500, 1100),
              (7.6085, -29.5, -10, -21.5, 4300, 804), (7.6475, -22, -13.5, -28.5, 3860, 832),
              (7.7358, -27.5, -14, -28, 3700, 848), (7.7819, -21.5, -8, -14.5, 6200, 996),
              (7.7887, -23, -12, -14.5, 2750, 1075), (7.7996, -15, -11.5, -26, 2020, 792),
              (7.8714, -37.5, -22, -12.5, 3980, 1650), (8.0539, -48.5, 6.5, -10, 3600, 1033),
              (8.173, -40.5, -5.5, -29, 3800, 1140), (8.2367, -40, -7, -12, 3780, 1140),
              (8.3503, -39, -20, -7.5, 3970, 1130), (8.386, -32, -6, -10, 3860, 1130),
              (8.4323, -38, 3, -13, 3300, 1156), (8.4577, -35.5, -2, -16, 3880, 1265),
              (8.549, -35.5, 1, -10, 3000, 1160), (8.74, -32.5, 2, -27, 3760, 722),
              (8.9218, -34.5, -51, -13, 5700, 1080), (8.9502, -33.5, -20, -8.5, 3600, 665),
              (9.0012, -37, -12.5, -14, 5670, 1680), (9.1186, -32.5, -18, -10, 6000, 1320),
              (9.1521, -46, 4, -9, 4640, 1060), (9.2284, -36, -6, -7.5, 4950, 1180),
              (9.317, -41.5, -11, -24, 5840, 1130), (9.6377, -35.5, -16, -7.5, 2750, 1590),
              (9.654, -28.5, -13, -8, 2980, 1510), (9.7599, -21, -14, -28, 2160, 1070),
              (9.8131, -16, -3.5, -15, 1790, 1300), (9.8218, -16, -9, -12, 1870, 1270)]


def snaps():
    """Bursts of a few ms, each leaving two short tones; rows: crack, flap jerk, edge, tones, ring and flap Hz."""
    t60_s, first_t60_s, first_break, rise_s = 0.019, 0.002, 1.3, 0.0002  # first break re following burst
    ring_cycles, flap_cycles = 4.5, 8  # tone lives to 1/e
    ring_db, flap_ring_db = 7, 22.5
    drive, t = np.zeros((4, N + SR)), np.arange(SR // 25) / SR
    jerk = np.arange(len(t)) == 0  # one-sample impulse

    def tone(hz, cycles):
        jitter = np.cumsum(rng.normal(0, 0.047, len(t)))
        return norm(np.exp(-t * hz / cycles) * np.sin(2 * np.pi * hz * t + jitter))

    for start_s, db, buzz_db, crisp_db, hz, flap_hz in GLUE_SNAPS:
        decay = amp(-60 * t / t60_s) + first_break * amp(-60 * t / first_t60_s)
        burst = norm(rng.standard_normal(len(t)) * decay * (1 - np.exp(-t / rise_s)))
        levels_db = db + np.array([15, buzz_db + 24.5, crisp_db + 27.5, 0])
        tones = amp(ring_db) * tone(hz, ring_cycles)
        tones = tones + amp(flap_ring_db + buzz_db) * tone(flap_hz, flap_cycles)
        drive[:, round(start_s * SR):][:, :len(t)] += amp(levels_db)[:, None] * [burst, jerk, burst, tones]
    table = np.array(GLUE_SNAPS)
    # pitches switch 1 ms ahead of each snap
    latest = np.maximum(np.searchsorted(table[:, 0], np.arange(N) / SR + .001) - 1, 0)
    return *drive[:, :N], table[latest, 4], table[latest, 5]


# knocks and jerks on the hollow box, before mix gains; thud re level: start_s, level_db, desk_thud_db
BOX_KNOCKS = [(0.143, -33, -32), (0.354, -32.5, -21), (0.876, -35, -30), (1.88, -29, -17),
              (1.918, -14, -27), (2.422, -35.5, -18), (2.649, -19, -29), (2.874, -22.5, -27),
              (2.979, -20.5, 3), (3.274, -26, 12.5), (3.397, -6.5, -19), (3.431, -15, -28),
              (3.79, -37.5, -20), (3.969, -28, 4), (4.078, -30, -20), (4.125, -31, 8.5), (4.324, -29, -20),
              (4.825, -26.5, -24), (4.849, -20.5, -26), (4.904, -29.5, -19), (5.167, -24, -31),
              (5.241, -21.5, -33), (5.338, -16.5, -20), (5.403, -9, -14), (5.434, -20, -18),
              (5.5, -23, -25), (5.531, -30, -26), (5.567, -20.5, -24), (5.608, -10, -23),
              (5.657, -4.5, -10.5), (5.689, -22, -13), (5.763, -9, -23), (5.9357, -12.5, -27),
              (5.996, -6.5, -4.5), (6.019, -8, -20), (6.064, -18, -19), (6.62, -28.5, -30),
              (6.763, -19.5, -23), (6.968, -29, -41), (7.037, -28, -25), (7.081, -27, -26),
              (7.35, -23, -38), (7.377, -22, -30), (7.52, -20.5, -21), (7.784, -14.5, -26),
              (8.056, -29.5, -14), (8.353, -40, -7), (8.39, -24.5, 10), (8.486, -16, -23),
              (8.705, -24.5, -3), (8.746, -17, -2), (8.955, -35, -22), (9.515, -26, -24), (9.822, -15.5, 7)]


def knocks():
    """Every knock rings the walls and the desk top as decaying sines at new strengths."""
    out, t = np.zeros(N + SR), np.arange(SR // 5) / SR

    def ring(table):
        total = 0
        for hz, w, db in table:
            decay = np.exp(-np.pi * w * t)
            total = total + amp(db + rng.normal(0, 3.05)) * decay * np.sin(2 * np.pi * hz * t)
        return total

    onset = 1 - np.exp(-t / 0.0026)
    for start_s, db, desk_db in BOX_KNOCKS:
        rung = ring(BOX_MODES) + amp(desk_db - 12.5) * ring(DESK_MODES)
        out[round(start_s * SR):][:len(t)] += amp(db - 1.0) * onset * rung
    return out[:N]


# recessed microphone re the open one: freq_hz, gain_db
PORT_RESPONSE = [(60, -2), (340, -12), (1000, -9.5), (3000, -4.5), (5600, -4.5), (7050, 7), (8100, -7),
                 (10000, -18), (12500, -29), (16000, -23.5)]
# share of the recessed microphone in the mix: time_s, share_db
MIC_BLEND = [(0, -3.5), (2, -7), (4.5, -13), (6.2, -16.5), (8.4, -19.5), (8.55, -9.5), (8.75, -1.5), (9, 0),
             (9.86, -0.6)]


def microphones(recessed, front):
    """Port-coloured microphone on both sides; the open one fills in on the right."""
    def above_port(hz):
        return (1j * hz / 11500) ** 6 / (1 + (hz / 11500) ** 6)

    share = amp(np.minimum(curves(MIC_BLEND)[0], 0))
    both = share * filtered(recessed, colour(PORT_RESPONSE))
    # above the port's range the right side always keeps some of the open microphone
    air = amp(-10.5) * share * filtered(front, above_port)
    return np.array([both, both + (1 - share) * front + air])


def scene():
    """Hands, box, desk and room through the two microphones, plus the shake of the mount."""
    near = tape() + knocks() + desk()
    recessed, front = near + amp([[-6.5], [-8]]) * room(near) + room_tone()
    return microphones(recessed, front) + rumble()


def record(dry):
    """The camera keeps nothing above its band limit."""
    top_hz = 15900
    return filtered(dry, lambda hz: hz < top_hz)


dry = scene()
out = record(dry)
dump(out)
```